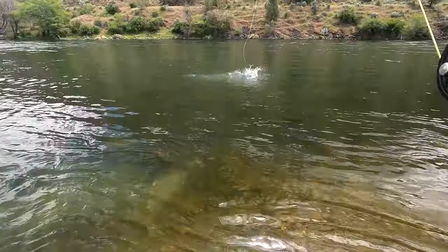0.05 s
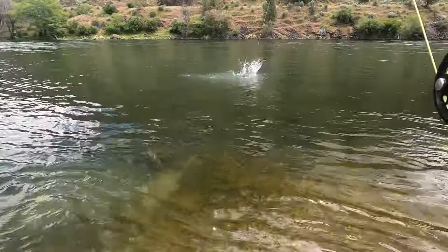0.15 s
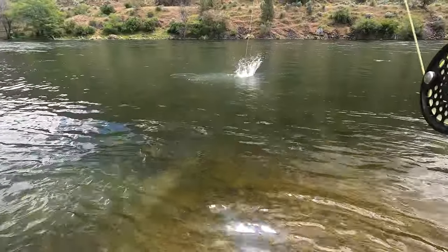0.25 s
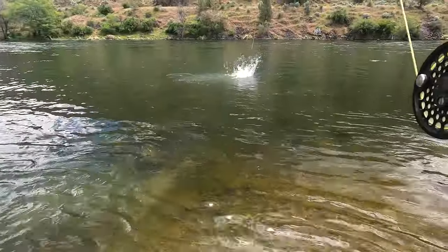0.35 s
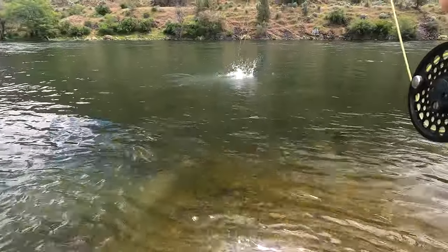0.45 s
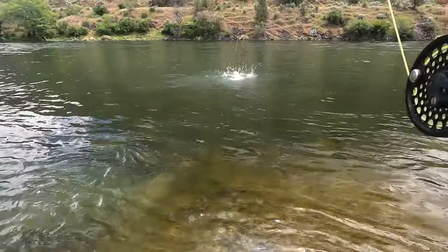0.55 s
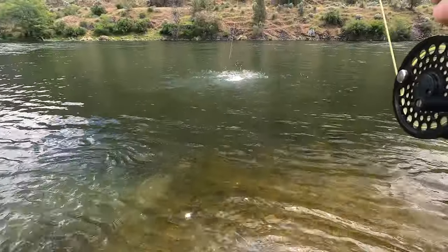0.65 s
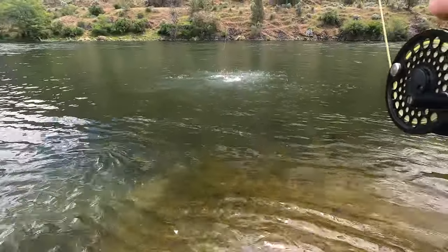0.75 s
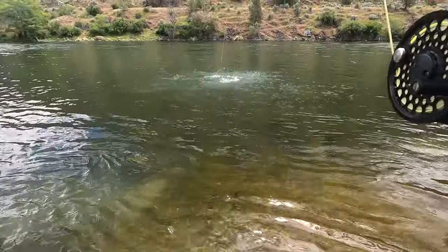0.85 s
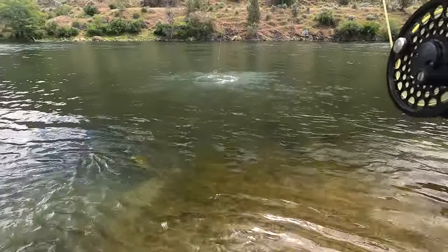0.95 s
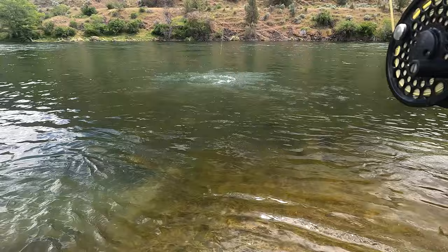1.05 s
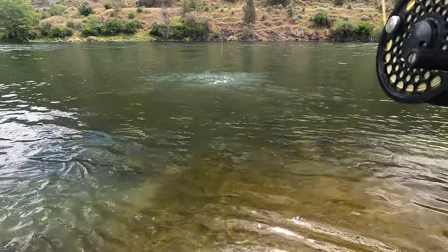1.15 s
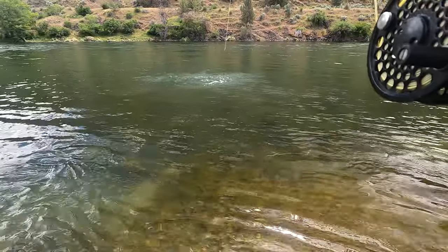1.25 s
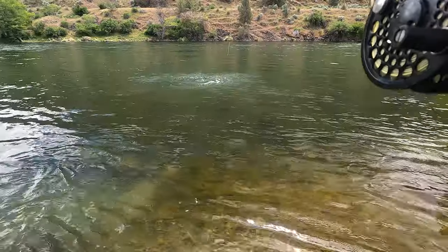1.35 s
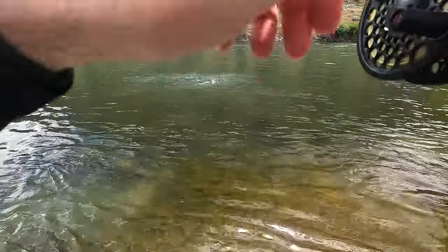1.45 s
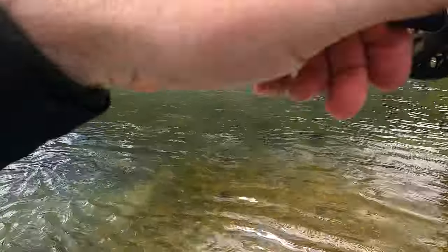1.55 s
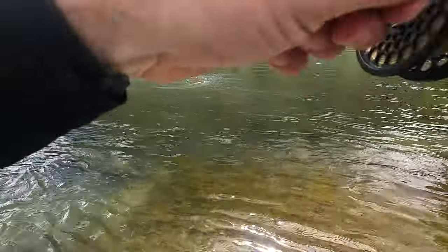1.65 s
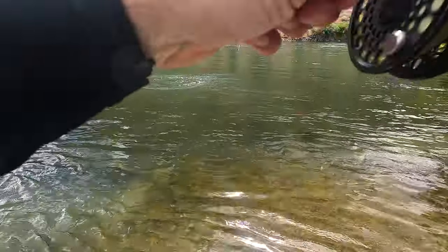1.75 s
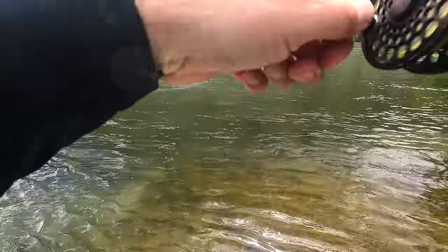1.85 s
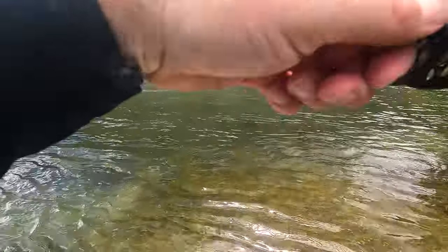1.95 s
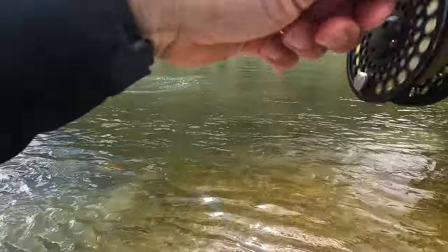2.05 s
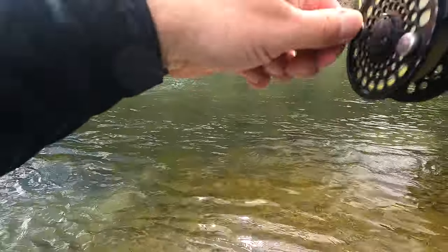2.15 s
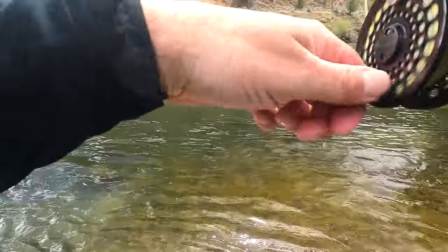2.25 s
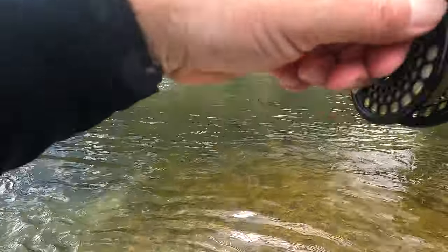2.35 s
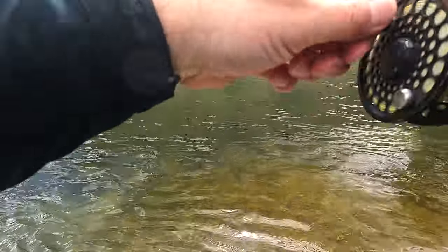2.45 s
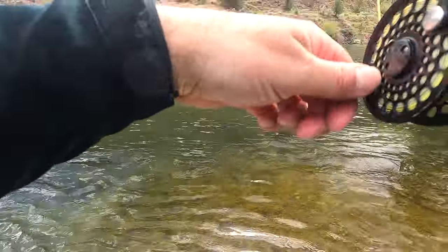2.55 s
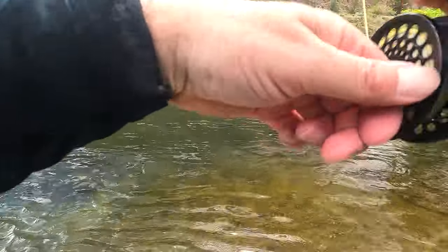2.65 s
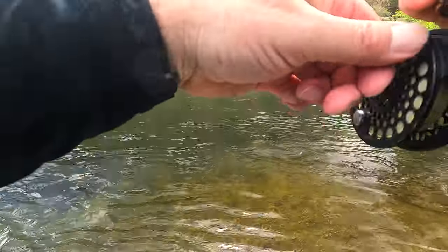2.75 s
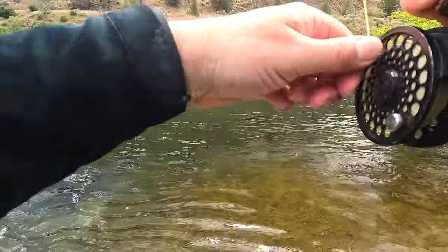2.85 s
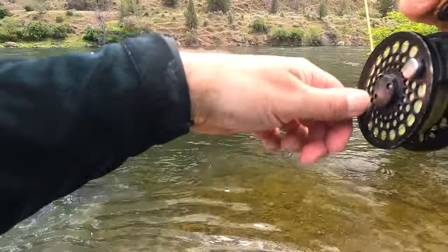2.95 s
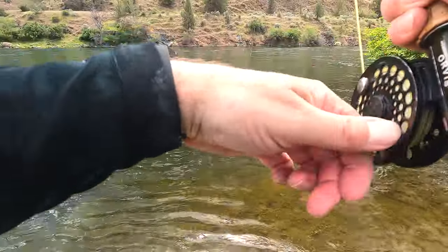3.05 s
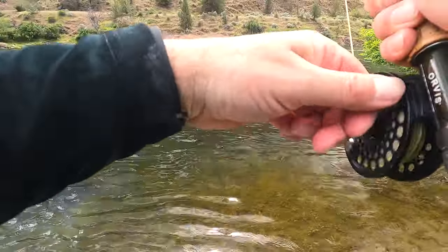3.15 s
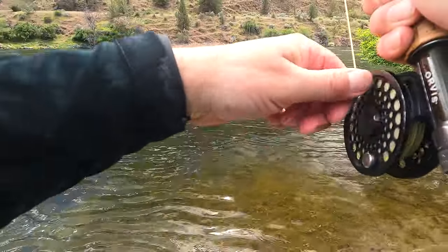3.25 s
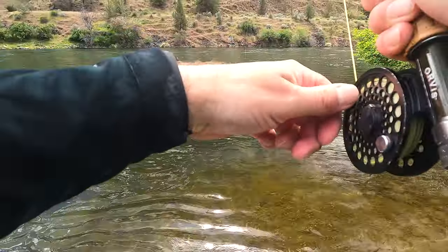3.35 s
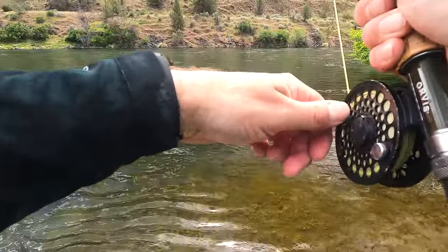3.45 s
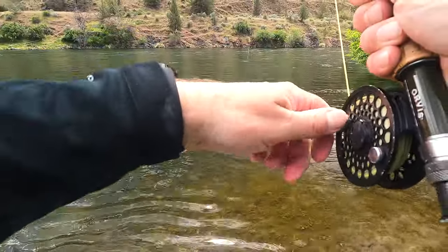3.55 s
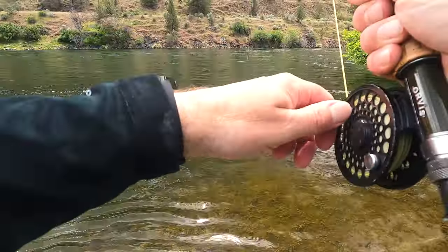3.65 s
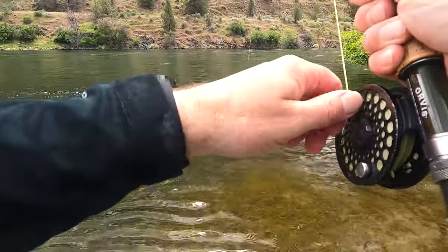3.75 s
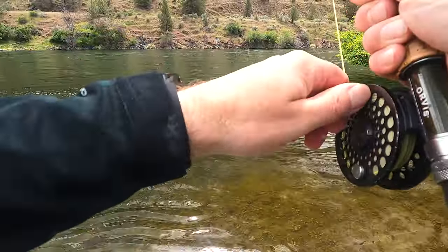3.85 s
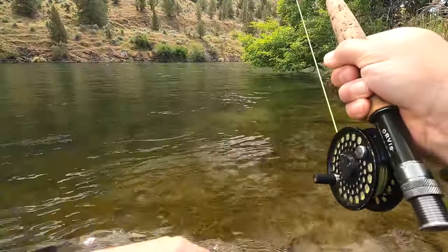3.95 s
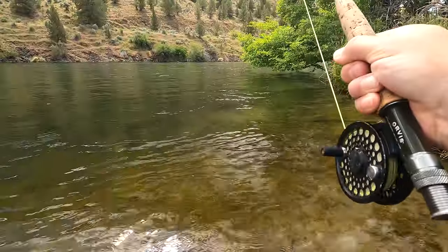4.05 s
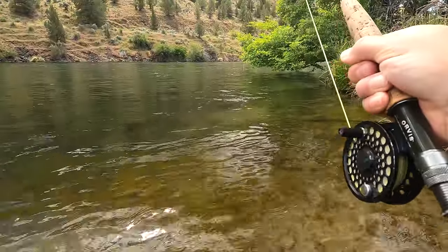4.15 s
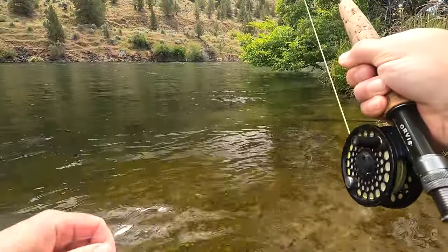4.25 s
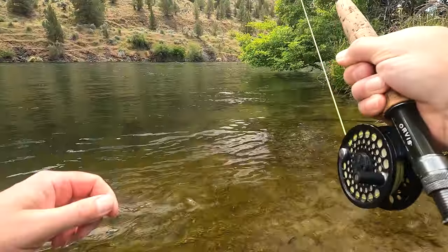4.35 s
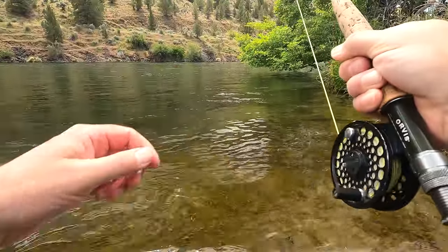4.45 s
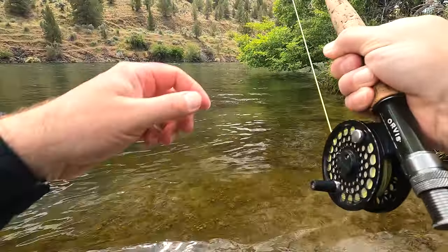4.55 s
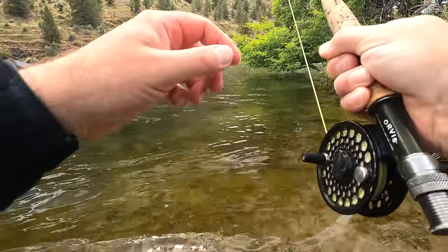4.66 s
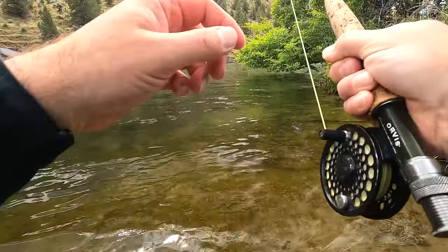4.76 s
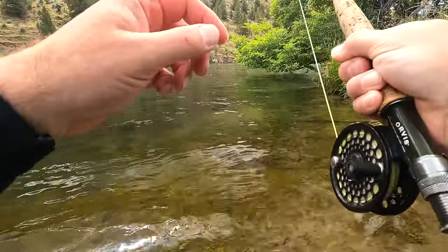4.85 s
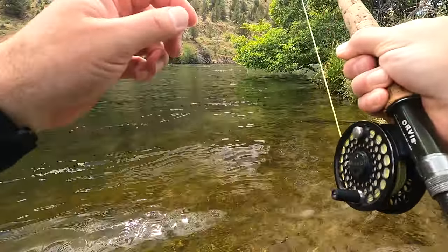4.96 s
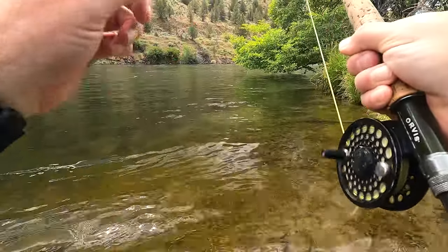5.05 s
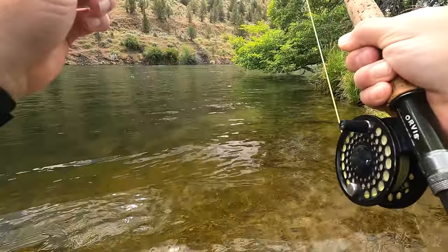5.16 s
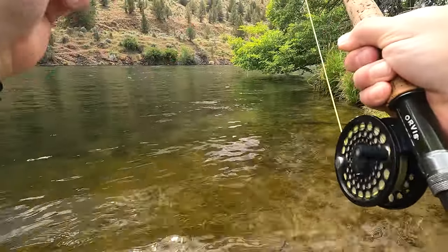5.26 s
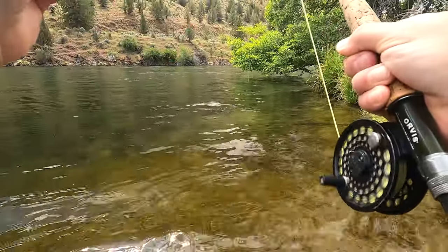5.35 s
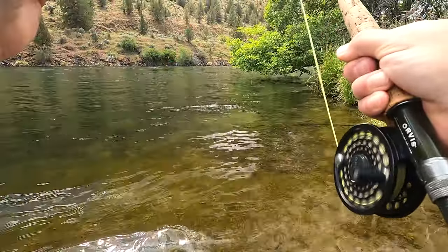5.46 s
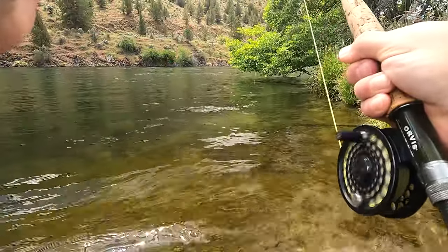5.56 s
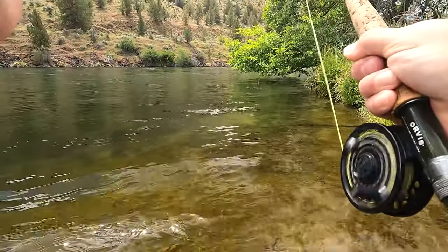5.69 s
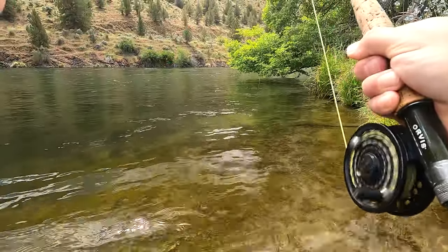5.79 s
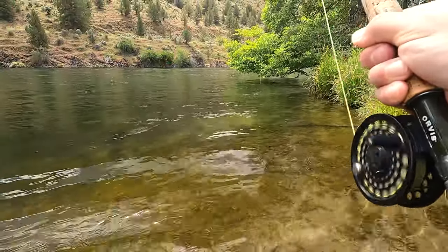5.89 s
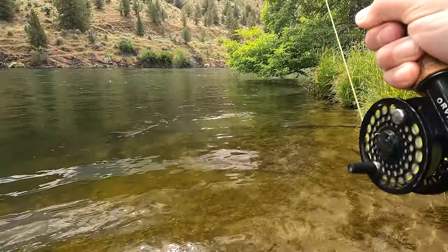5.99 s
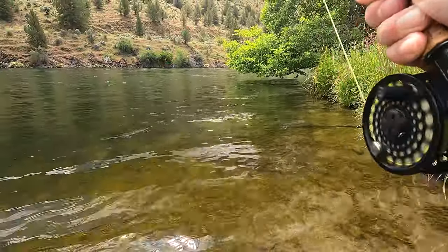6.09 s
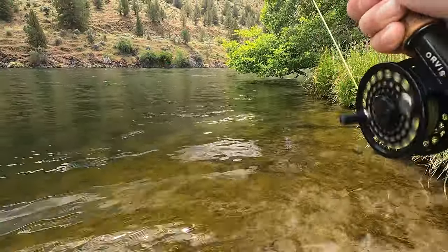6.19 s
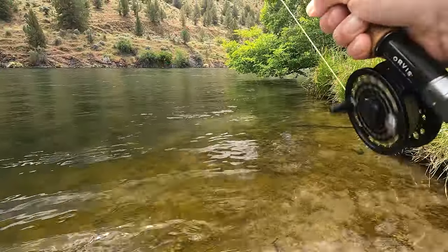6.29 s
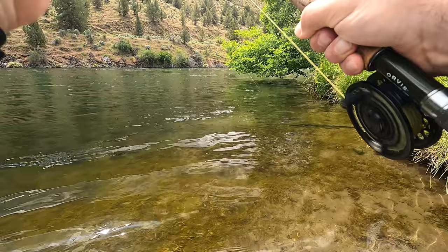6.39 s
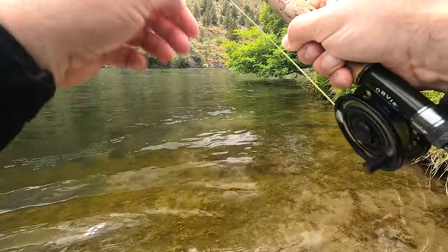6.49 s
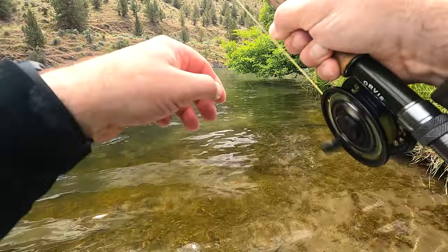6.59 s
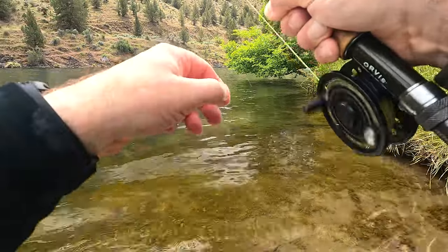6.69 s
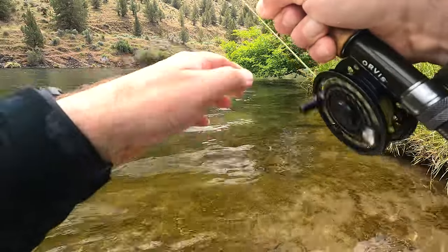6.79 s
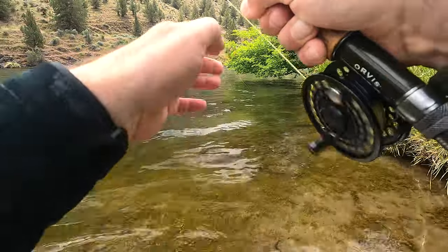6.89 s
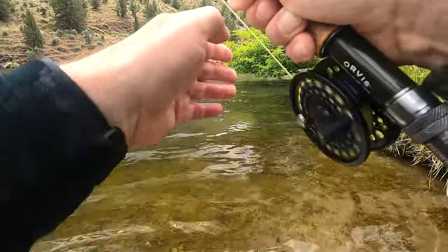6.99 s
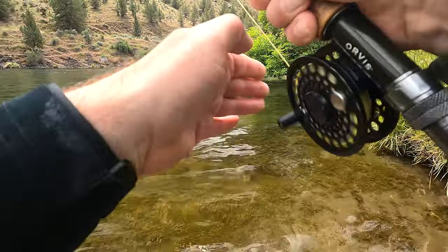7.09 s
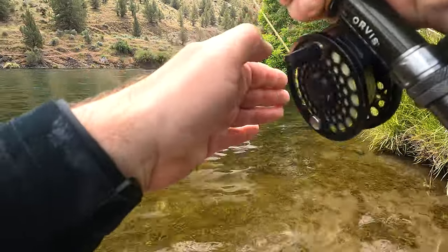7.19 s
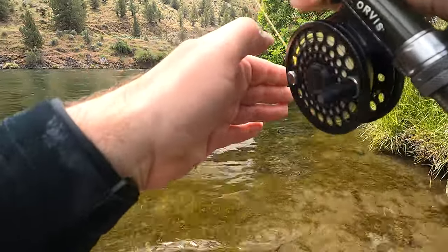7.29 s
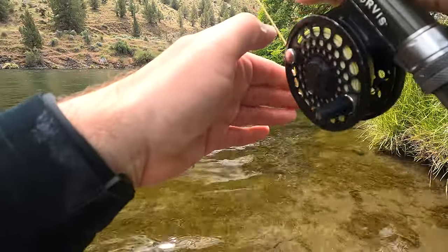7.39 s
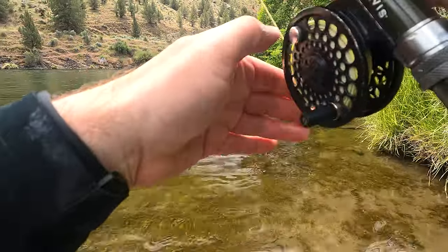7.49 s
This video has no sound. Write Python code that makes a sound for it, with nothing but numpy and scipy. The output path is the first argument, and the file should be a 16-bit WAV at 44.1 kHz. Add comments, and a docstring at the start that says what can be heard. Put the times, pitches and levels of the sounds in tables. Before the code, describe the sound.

Wet slaps and bubbles by a windy river, a steady run of reel clicks, a pause, then a rough ratcheting buzz that surges and slows.

```python
"""On a river, a fish splashes in rings of bubbles and spray while wind buffets a small stereo microphone.
A hand winds a fly reel, one pawl click a tooth; then the fish pulls line and the pawl buzzes
at spool speed, biting harder once a turn of the slightly off-centre gear. Clicks and buzz are impulses
through resonances; water and wind are shaped noise with sine bubbles, drops and a faint chirp."""
import sys
import numpy as np
from scipy import signal
from scipy.fft import rfft, irfft, next_fast_len
from scipy.io import wavfile
from scipy.ndimage import uniform_filter1d

SR = 44100
rng = np.random.default_rng(int(sys.argv[2]) if len(sys.argv) > 2 else 0)


def dump_mix(stems):
    """Bounce the given channels to the path in sys.argv[1] as a 16-bit WAV at rate SR."""
    frames = np.atleast_2d(stems).T  # one column per channel
    limited = np.clip(frames, -1, 1)  # hard clip at full scale
    pcm = np.round(limited * 32767).astype(np.int16)
    wavfile.write(sys.argv[1], SR, pcm)


N = 332073
T = np.arange(N) / SR

# churning water: (time [s], level [dB])
CHURN = [(0, -51.5), (.25, -43), (.7, -33), (.82, -34.5), (1.1, -51), (1.62, -62.5)]
# body of a water drop or tap: (centre [Hz], width of the first stage [Hz], level [dB])
DROP_BODY = [(3830, 3600, 3), (6900, 4000, 3)]
# spool speed while line runs out: (time [s], speed [teeth/s])
SPEED = [(0, 118), (4.02, 68), (4.085, 38), (4.14, 51.5), (4.225, 69), (4.27, 63), (4.55, 52), (4.8, 72),
         (4.9, 100), (5.06, 78), (5.18, 120), (5.4, 75), (5.52, 262), (5.63, 250), (5.77, 432),
         (5.835, 440), (5.88, 357), (6.03, 280), (6.05, 135), (6.14, 150), (6.21, 240), (6.3, 213),
         (6.374, 469), (6.43, 390), (6.505, 545), (6.552, 492), (6.652, 512), (6.705, 454), (6.778, 468),
         (7.03, 262), (7.26, 143), (7.42, 60)]
# each pass of the gear's slack side at the pawl: (time [s], buzz level around it [dB])
TURNS = [(-.09, -26), (.06, -34), (3.86, -37.5), (4.48, -45.5), (4.99, -31.5), (5.345, -35), (5.585, -23.5),
         (5.72, -27), (5.81, -23), (5.905, -25), (6.035, -30), (6.24, -27), (6.375, -23), (6.465, -25),
         (6.54, -24), (6.615, -25), (6.692, -23), (6.775, -22.5), (6.86, -22), (6.97, -25), (7.12, -22.5),
         (7.45, -38.5)]
# round one turn, before scaling by each user: (share of turn, bite [dB], spring ring [Hz])
GEAR = [(0, -10.5, 4670), (.28, -5.5, 4870), (.42, -2.5, 6100), (.58, -1, 6450), (.78, -2.5, 6420),
        (.9, -11, 5400), (1, -15.5, 4700)]
# spells of line running out: (first tooth [s], end [s])
RUNS = [(.003, .045), (3.951, 7.42)]


def amp(db):
    """Gain of a level in dB."""
    return 10 ** (np.asarray(db) / 20)


def evened(x):
    """Scales to rms 1."""
    return x / np.sqrt(np.mean(x ** 2) + 1e-20)


def wander(width):
    """A random curve of rms 1, smoothed over a width in samples."""
    return evened(uniform_filter1d(rng.standard_normal(N), size=width))


def read(points, hz):
    """Reads a spectrum table on a log-frequency axis."""
    f, value = np.transpose(points)
    # abs makes the frequencies real again when the values are complex
    return np.interp(np.log(hz + 1), np.log(abs(f) + 1), value)


def curves(rows, t=T):
    """Joins each column of a table by straight lines."""
    s, *columns = np.transpose(rows)
    return [np.interp(t, s, c) for c in columns]


def resonate(x, hz, width):
    """A resonance of gain 1: shifts the curve hz down to zero, smooths, and shifts back."""
    turn = np.exp(2j * np.pi * np.cumsum(hz * np.ones(x.shape[-1])) / SR)
    r = np.exp(-np.pi * width / SR)
    smooth = signal.lfilter([1 - r], [1, -r], x / turn)
    return 2 * (turn * smooth).real


def modes(x, table, shift=1):
    """A body of steep two-stage resonances with alternating sign; shift scales all their pitches."""
    out = 0
    for k, (hz, width, db) in enumerate(table):
        first = resonate(x, hz * shift, width)
        out = out + (-1) ** k * amp(db) * resonate(first, hz * shift, 2 * width)
    return out


def train(s, size):
    """Impulses of the given sizes at times s."""
    return np.bincount(np.round(s * SR).astype(int), size, N + SR)[:N]


def noise(spectrum, same, patchy_db, flicker_db, size=512):
    """Two partly alike channels of random short-time spectra with patches and flicker, at rms 1."""
    hop = size // 4
    frames, hz = N // hop + 5, np.fft.rfftfreq(size, 1 / SR)
    a, b, c, d, patches = rng.standard_normal((frames, len(hz), 5)).T
    patches = uniform_filter1d(patches, size=6, axis=0)
    patches = evened(uniform_filter1d(patches, size=8, axis=1))
    flicker = evened(uniform_filter1d(rng.standard_normal(frames), size=4))
    # falls 36 dB an octave past the table's end
    beyond_db = -36 * np.log2(np.maximum(hz / spectrum[-1][0], 1))
    field_db = (read(spectrum, hz) + beyond_db)[:, None] + patchy_db * patches + flicker_db * flicker
    same = np.clip(same, 0, 1)
    left = a + 1j * b
    right = same * left + np.sqrt(1 - same ** 2) * (c + 1j * d)
    z = np.array([left, right]) * amp(field_db)
    return evened(signal.istft(z, nperseg=size, noverlap=size - hop)[1][:, :N])


def air_and_water():
    """Lumpy wind buffeting and a low roar at the ports, over the steady hiss of the river."""
    # colour of each noise: (frequency [Hz], relative density [dB])
    buffet_colour = [(12, 8), (28, 20), (44, 11), (62, -10)]
    roar_colour = [(60, -27.5), (120, -6.5), (250, 3.5), (500, -4), (850, -16)]
    river_colour = [(100, -26.5), (150, 16.5), (310, 3), (750, -12), (1300, 8), (2200, -2), (8000, -18)]
    # wind: (time [s], buffeting before the port trims [dB], roar [dB])
    wind = [(0, -24, -49.5), (.5, -32.5, -41.5), (1.1, -47, -54.5), (1.6, -37, -52), (1.9, -44, -61.5),
            (3.12, -50, -59), (3.2, -52, -46), (3.5, -40, -49), (3.7, -60.5, -57.5), (4.08, -46.5, -61),
            (4.16, -33, -54), (4.34, -33.5, -57), (4.42, -45, -51), (5.1, -49, -64), (6.4, -48, -58),
            (7.53, -45.5, -65.5)]
    buffet_db, roar_db = curves(wind)
    port_trim_db = [[-5.], [-1.]]  # left, right
    buffet = noise(buffet_colour, same=0.88, patchy_db=3, flicker_db=2, size=2048)
    buffet *= amp(buffet_db + port_trim_db)
    roar = noise(roar_colour, same=0.98, patchy_db=2, flicker_db=1.5, size=1024) * amp(roar_db)
    river = amp(-55.5) * noise(river_colour, same=0.6, patchy_db=3, flicker_db=1)
    return buffet + roar + river


def churn_db():
    """Level of the thrown water: the churn plus each slap of the fish, which rises fast and dies away."""
    # the fish slaps the surface: (time [s], peak level [dB], fall [dB/s])
    slap_rows = [(0, -51, 380), (0.13, -31.5, 153), (0.293, -33, 113), (0.488, -34.5, 117),
                 (0.594, -31.5, 76)]
    s, peak_db, fall = np.transpose(slap_rows)[..., None]
    rise_s = 0.0044
    rise = np.clip((T - s) / rise_s + (s == 0), 0, 1)  # a slap at time 0 is already up
    slaps = amp(peak_db - fall * np.maximum(T - s, 0)) * rise
    return 10 * np.log10(amp(curves(CHURN)[0]) ** 2 + (slaps ** 2).sum(0))


def bubbles():
    """Trapped air pockets ring as sines that swell in, rise in pitch and die away."""
    # (time [s], level before the swell-in [dB], starting pitch [Hz], 60 dB decay [s])
    pockets = [(.135, -23, 1850, 0.065), (0.329, -17.5, 404, 0.075), (0.382, -27, 1800, 0.05),
               (0.499, -6, 526, 0.0099), (0.608, -17, 296, 0.079), (.61, -6, 504, 0.016),
               (0.306, -20, 438, 0.059), (0.643, -16, 394, 0.034)]
    out = np.zeros(N)
    for s, peak_db, hz, t60 in pockets:
        t = np.arange(round(t60 * SR)) / SR
        swell = 1 - np.exp(-t * hz * 0.68)
        tone = np.sin(2 * np.pi * hz * (t + 0.053 * t ** 2 / t60)) * swell
        out[round(s * SR):][:len(t)] += amp(peak_db - 60 * t / t60) * tone
    return out


def froth():
    """Random small bubbles in 16 pitches, each a short rising blip, follow the churn."""
    pitch_range = (600, 3200)  # (lowest [Hz], highest [Hz])
    per_s, over_churn_db = 200, -8  # rate over all pitches
    level = amp(churn_db() + over_churn_db) * (T < CHURN[-1][0])
    t, out = np.arange(1500) / SR, np.zeros(N)
    for hz in np.geomspace(*pitch_range, num=16):
        happens = rng.random(N) < per_s / 16 / SR
        pops = amp(4 * np.minimum(rng.exponential(1, N), 4)) * happens
        swell = t * hz / 3 * np.exp(1 - t * hz / 3)
        blip = np.sin(2 * np.pi * hz * (t + 4 * t ** 2)) * swell
        out += signal.oaconvolve(pops * level, blip)[:N]
    return out


def chirp():
    """A faint rising sine, broken up by random level changes."""
    # (time [s], level before the breaking-up [dB], pitch [Hz])
    glide = [(1.232, -50, 1450), (1.25, -45, 2200), (1.275, -52, 2950), (1.356, -50, 3700)]
    level_db, hz = curves(glide)
    heard = (T > glide[0][0]) & (T < glide[-1][0])
    broken_db = 5.5 * wander(300) - 5
    return amp(level_db + broken_db) * heard * np.sin(2 * np.pi * np.cumsum(hz) / SR)


def splash():
    """Thrown water as patchy spray noise, with ringing bubbles and froth, a little stronger on the right."""
    # (frequency [Hz], relative density [dB])
    spray_colour = [(200, -36), (288, -23), (437, -14), (2170, -9.5), (10200, -38), (15500, -59)]
    spray = noise(spray_colour, same=0.88, patchy_db=3.0, flicker_db=1.5, size=256)
    fade = np.clip((CHURN[-1][0] + 0.0051 - T) / 0.1, 0, 1)
    water = spray * amp(churn_db()) * fade + bubbles() + froth()
    return water * amp([[-.6], [.6]])


def droplets():
    """Thrown water falls back as fine hiss and separate drops, fading more slowly than the splash."""
    drops_per_s = 160
    happens = rng.random(N) < drops_per_s / SR
    drops = amp(3.5 * np.minimum(rng.exponential(1, N), 4)) * happens
    fine = modes(drops + 0.1 * rng.standard_normal((2, N)), DROP_BODY)
    fade = np.clip((CHURN[-1][0] - T) / 0.083, 0, 1)
    return amp(.5 * churn_db() - 27.0) * fade * evened(fine)


def running():
    """One strike a tooth rings the frame; the pawl spring rings just after, higher where the gear bites."""
    # bodies of frame and rim: (centre [Hz], width of the first stage [Hz], relative level [dB])
    frame_body = [(1600, 1280, -18), (2560, 675, -7), (3433, 404, -3), (4600, 1960, -8.5), (6210, 1030, -3)]
    rim_body = [(7664, 1005, 1.5), (9824, 500, -2), (11700, 2900, -21.5)]
    # spring ring over the buzz, before a trim: (time [s], level [dB])
    ring_curve = [(3.8, 1.5), (5.8, 5), (6.5, -7.5), (7.1, -9), (7.45, 11.5)]
    # delay of the second path: (start of a turn [s], end of a turn [s])
    path_ends = [.0009, 0.00028]
    jerk, rim_climb = .007, 0.054  # uneven pull, share of speed; rise of the rim's pitch over a turn, share

    speed = curves(SPEED)[0] * (1 + jerk * wander(900))
    teeth = np.cumsum(speed) / SR
    # turns are counted in teeth, so the gear's angle follows the spool speed
    turn_teeth = np.interp(np.transpose(TURNS)[0], [-1, *T], [-speed[0], *teeth])
    turn = np.interp(teeth, turn_teeth, np.arange(len(TURNS)))
    bite_db, spring_hz = curves(GEAR, turn % 1)
    bite_db = bite_db * (300 / speed) ** 0.67  # a slow pawl loses the slack teeth more
    buzz_db, ring_db = curves(TURNS)[0], curves(ring_curve)[0]
    # off centre, the teeth pass faster on one side
    teeth += .1 * (np.sin(2 * np.pi * (turn - .55)) - 2 * np.pi * turn)
    at = np.concatenate([np.interp(np.arange(*np.interp(run, T, teeth)), teeth, T) for run in RUNS])

    chance = rng.standard_normal((len(at), 4))
    loose_s = 1e-5 * amp(-2. * np.interp(at, T, bite_db).clip(-12))  # slack teeth land unevenly
    strikes = train(at + loose_s * chance[:, 0], amp(1.2 * chance[:, 1]))
    late = np.minimum(.2 / np.interp(at, T, speed), .002) + loose_s * chance[:, 2]
    rebounds = train(at + late, amp(1.2 * chance[:, 3]))
    # each contact chatters briefly, less so once the pawl only skims the tips
    touch = np.arange(400) / (.0004 * SR)
    chatter = signal.oaconvolve(strikes + rebounds, touch * np.exp(1 - touch))[:N]
    scrape = .1 * chatter * rng.standard_normal(N) * (70 / speed) ** .8
    # slow or slack contacts are mostly scrape
    crisp = np.clip(speed / 450, 0, 1) ** .4 * amp(.7 * bite_db)
    strikes, rebounds = crisp * strikes, crisp * rebounds
    # a second, delayed path through the spool shortens round the turn, so the colour sweeps upward
    path_s = np.interp(np.interp(at, T, turn) % 1, [0, 1], path_ends)
    second = crisp * train(at + path_s, amp(-7 + 0.99 * chance[:, 1]))

    density = amp(buzz_db) * np.sqrt(SR / speed)  # keeps power apart from rate
    contact = (strikes + second + 1.2 * scrape) * density
    # the body throbs less than the rim
    body = modes(contact * amp(0.44 * bite_db) * (speed / 300) ** 0.27, frame_body)
    # the rim hears the pawl's release more than its landing
    snap = (0.52 * strikes + rebounds + scrape) * density
    climb = 1 + rim_climb * (turn % 1 - .5)
    rim = modes(snap * amp(1.4 * bite_db), rim_body, climb)
    drive = (rebounds + scrape) * density * amp(ring_db + 10.5 + 2.33 * bite_db)
    spring = resonate(resonate(drive, spring_hz, 420), spring_hz, 960)
    return amp(10.0) * (body + rim - spring)


def ticks():
    """Small ticks and taps of drops, line and fingers: quick cycles at each centre over a wide, dull crack."""
    # (time [s], level of the cycles before they decay [dB], centre [Hz])
    taps = [(.082, -20.5, 2560), (0.089, -18, 2100), (0.134, -14, 2500), (0.31, -18.5, 1390),
            (1.092, -35, 7300), (1.107, -26, 2870), (1.122, -34.5, 7700), (1.149, -25.5, 3180),
            (1.222, -33, 7520), (1.24, -40, 6380), (1.352, -32, 6200), (1.375, -48, 7050),
            (1.665, -21.5, 2080), (3.767, -35.5, 5570), (3.859, -36.5, 4380), (4.507, -26.5, 300),
            (4.507, -23.5, 1380), (4.634, -28.5, 1720), (4.67, -20.5, 1700)]
    out, t = np.zeros(N), np.arange(400) / SR
    for s, db, hz in taps:
        crack = hz / 4000 * rng.standard_normal(len(t)) * np.exp(-t / 0.00084)
        ring = np.sin(2 * np.pi * hz * t) * np.exp(-t * hz / 2)
        out[round(s * SR):][:len(t)] += amp(db) * (ring + modes(crack, DROP_BODY))
    return out


def rubbing():
    """Friction noise that sings in the spool's resonances; in the run it swells with the buzz."""
    # spool resonances: (centre [Hz], width of the first stage [Hz], relative level [dB])
    spool_body = [(1250, 135, -4.5), (2398, 285, 6), (6180, 400, -9)]
    # (frequency [Hz], relative density [dB])
    hiss_colour = [(1200, -19.5), (4000, -8), (7500, -17), (9200, -35)]
    # the spool slides on its drag while wound, then creeps before the run:
    # (start [s], end [s], level before the closing gain [dB])
    slide_rows = [(1.71, 3.54, -55.5), (3.77, 3.95, -64)]
    edge_s = 0.022
    throb, follows = 0.31, 0.46  # shares of the gear's bite and of the buzz's changes that it follows

    hiss = noise(hiss_colour, same=0.6, patchy_db=2.0, flicker_db=0.5, size=256)[0]
    grain = amp(2 * wander(150))
    tones = evened(modes(grain * rng.standard_normal(N), spool_body))
    turn = np.interp(T, np.transpose(TURNS)[0], np.arange(len(TURNS)))
    buzz_change_db = curves(TURNS)[0] + 25.0
    run_db = throb * curves(GEAR, turn % 1)[0] - 43 + follows * buzz_change_db
    fade = np.clip((SPEED[-1][0] + 0.16 - T) / 0.24, .1, 1)
    level = amp(run_db) * fade * (T > RUNS[1][0])
    for start, end, db in slide_rows:
        level = level + amp(db) * np.clip(np.minimum(T - start, end - T) / edge_s + .5, 0, 1)
    return amp(5.0) * level * (tones + amp(-2.0) * hiss)


def winding():
    """Each tooth snaps the pawl, which bounces a few times, weaker than the snap, and rings the reel."""
    # tooth clicks: (time [s])
    clicks = [1.784, 1.822, 1.8543, 1.8882, 1.929, 1.978, 2.0148, 2.0417, 2.0634, 2.089, 2.135, 2.1735,
              2.2075, 2.2413, 2.281, 2.325, 2.3576, 2.3854, 2.4099, 2.4356, 2.471, 2.5119, 2.5538, 2.5904,
              2.6303, 2.6685, 2.701, 2.7318, 2.759, 2.785, 2.8418, 2.8973, 2.943, 2.984, 3.0395, 3.0803,
              3.112, 3.1466, 3.1805, 3.218, 3.2667, 3.3098, 3.3617, 3.421]
    # low and treble bodies: (centre [Hz], width of the first stage [Hz], relative level [dB])
    low_body = [(2747, 1160, 0), (4310, 1900, 3), (5360, 2180, -4)]
    treble_body = [(7030, 1050, 7), (10170, 1300, -8.5), (12600, 3500, -23)]
    s = np.array(clicks)
    chance = rng.random((len(s), 11))
    db = -10.5 + .9 * (s - s[0]) + 1. * chance[:, 9]
    # the tip grazes, then lands
    graze = train(s - .00055 - .0001 * chance[:, 10], 0.6 * amp(db - 3))
    snaps = graze + train(s - .00035, amp(db - 3))
    late = np.cumsum(.002 + .004 * chance[:, :3], axis=1)
    bounce_db = db[:, None] - 21.5 - 10 * chance[:, 3:6]
    bounces = train((s[:, None] + late).ravel(), amp(bounce_db).ravel())
    snaps += signal.oaconvolve(bounces, np.hanning(5), "same")  # bounces land softly
    skid = signal.oaconvolve(snaps, np.exp(-np.arange(200) / (0.00071 * SR)))[:N]
    snaps += 0.07 * skid * rng.standard_normal(N)
    # no two teeth are alike, and the fingers damp the treble more as the reel turns away
    tooth = np.clip(np.searchsorted(s - .002, T) - 1, 0, None)
    low, high, bright = chance[tooth, 6:9].T - .5
    treble_db = -6. - 5.4 * (T - s[0]) + 5. * bright
    body = modes(snaps, low_body, 1 + .06 * low)
    treble = modes(snaps * amp(treble_db), treble_body, 1 + .06 * high)
    return amp(17.) * (body + treble)


def placed(x, echo_db):
    """Sets the reel in stereo by level and phase; hands and rod scatter a little back to each port."""
    # (frequency [Hz], left-right level [dB], phase by which the left leads [rad])
    side = [(1470, -0.5, 0.73), (2930, -3, -1.02), (4440, -1, 0.77), (8300, -1, -0.093),
            (15500, 1.5, -0.54)]
    size = next_fast_len(N)
    hz, side_db, lead = np.transpose(side)
    left_gain = amp(side_db / 2) * np.exp(.5j * lead)
    left = read(np.transpose([hz, left_gain]), np.fft.rfftfreq(size, 1 / SR))
    direct = irfft(rfft(x, size) * np.array([left, 1 / left]), size)[:, :N]
    t = np.arange(1000) / SR
    scatter = rng.standard_normal((2, len(t))) * amp(-60 * t / .02) * (t > .0007)
    scatter /= np.linalg.norm(scatter, axis=1, keepdims=True)
    return direct + amp(echo_db) * signal.oaconvolve(direct, scatter, axes=1)[:, :N]


def scene():
    """Reel near the microphone, water and wind around it."""
    # slight stereo drift of the reel: (time [s], left-right level [dB])
    drift = [(3.4, -0.5), (4., -1), (7.5, -0.5)]
    reel = placed(winding() + ticks() + rubbing(), echo_db=-9) + placed(running(), echo_db=-7)
    reel = reel * amp(curves(drift)[0] * [[.5], [-.5]])
    return reel + splash() + chirp() + droplets() + air_and_water()


def record(dry):
    """The band limit of the recorder: a steep low-pass."""
    edge_hz = 15550
    low_pass = signal.firwin(511, edge_hz, window=("kaiser", 9), fs=SR)
    return signal.oaconvolve(dry, low_pass[None], "same")


dry = scene()
out = record(dry)
dump_mix(out)
```